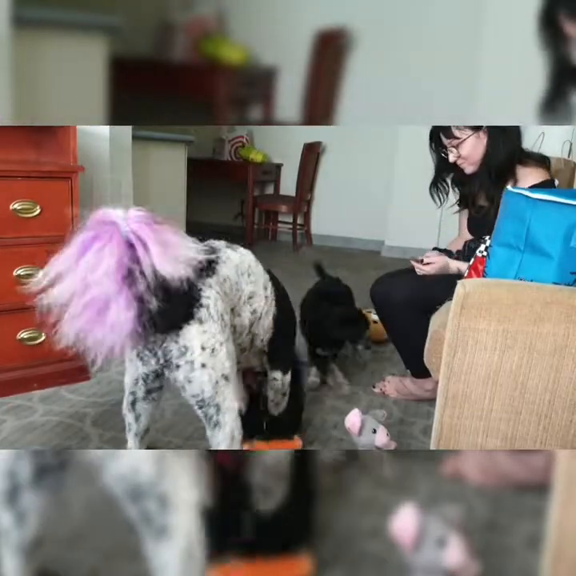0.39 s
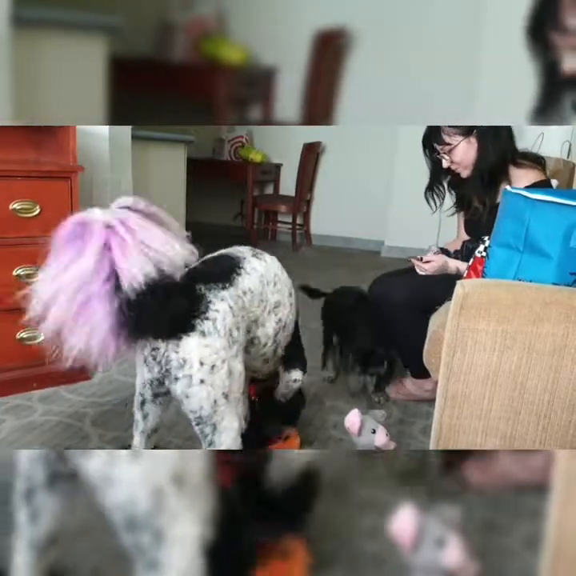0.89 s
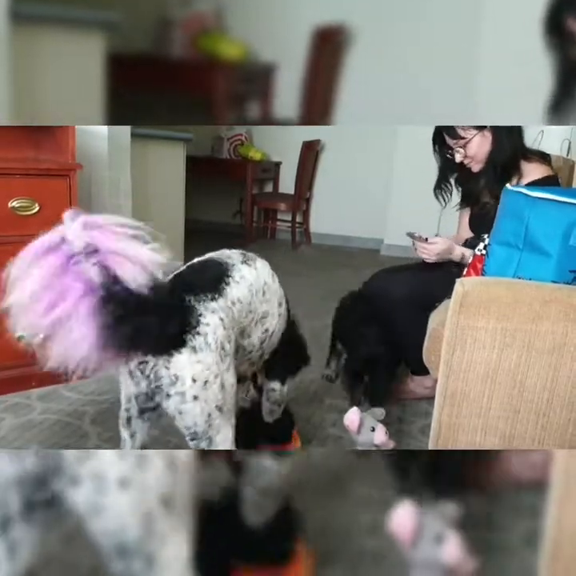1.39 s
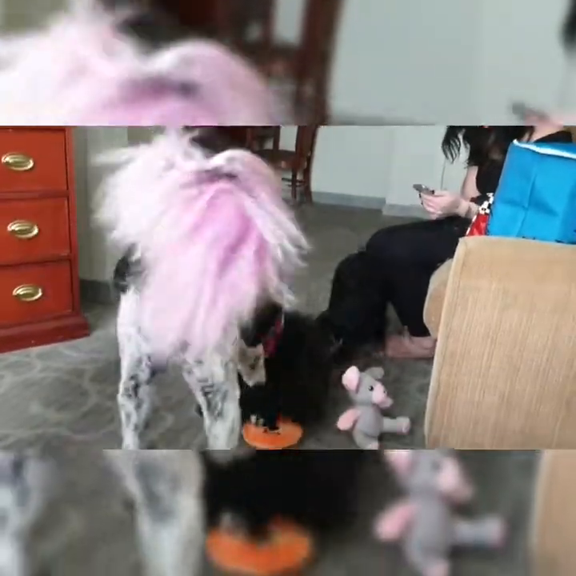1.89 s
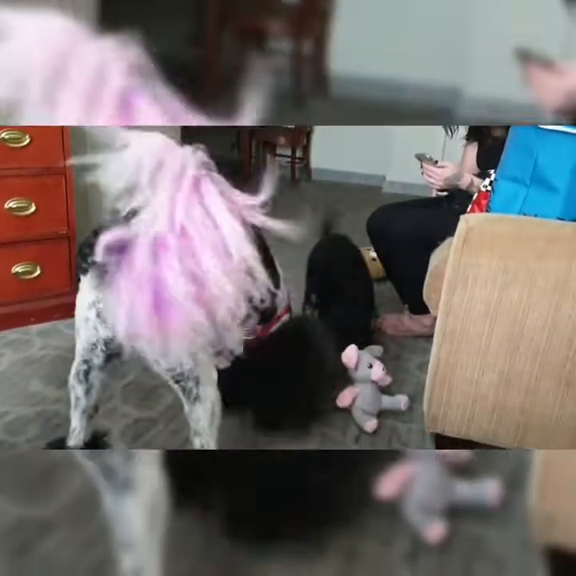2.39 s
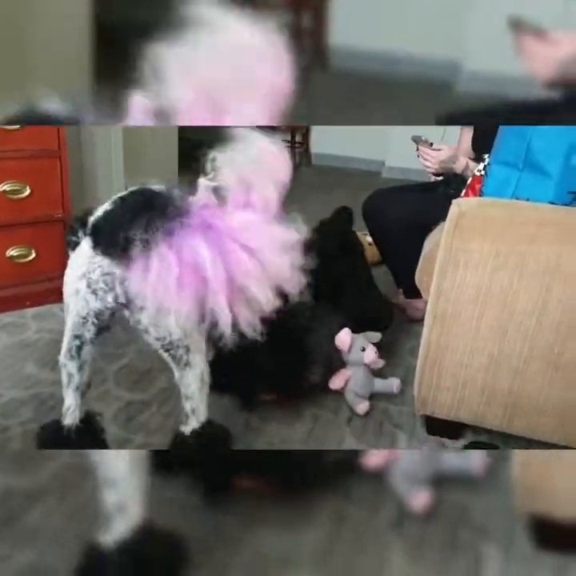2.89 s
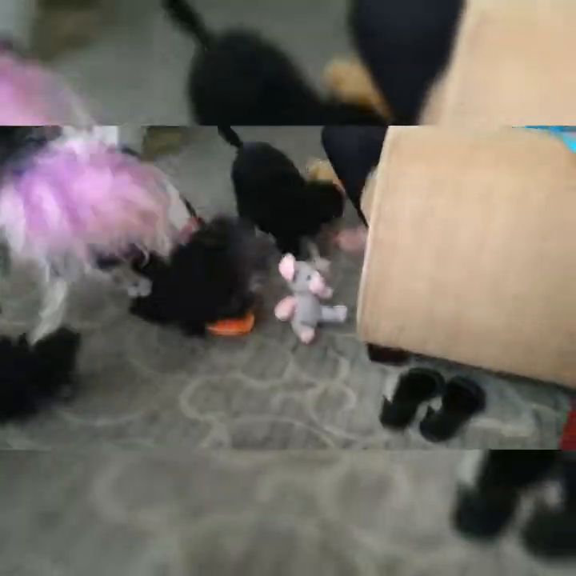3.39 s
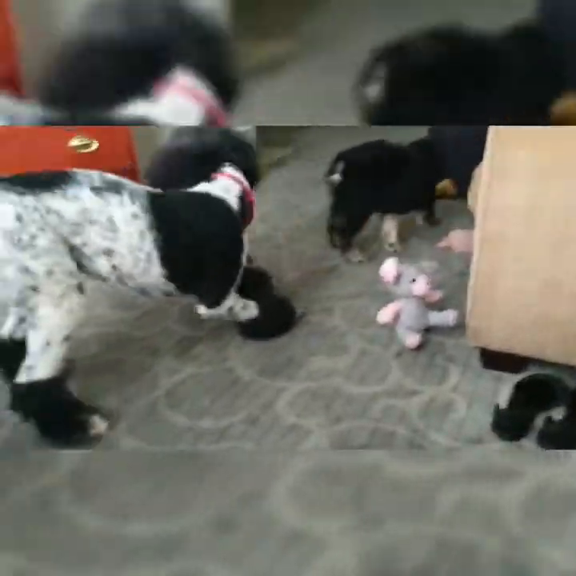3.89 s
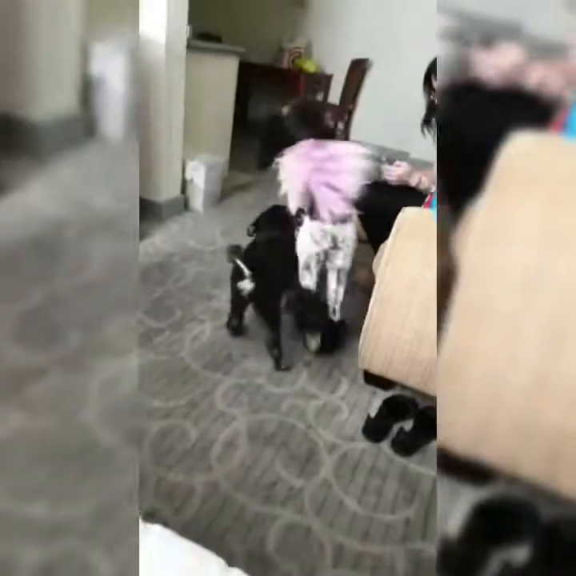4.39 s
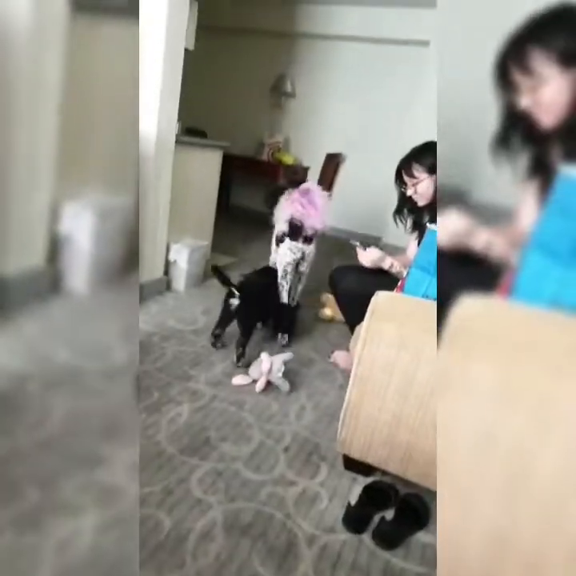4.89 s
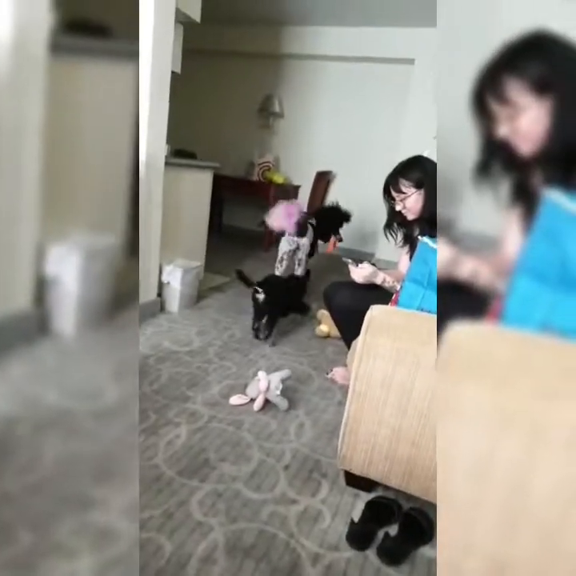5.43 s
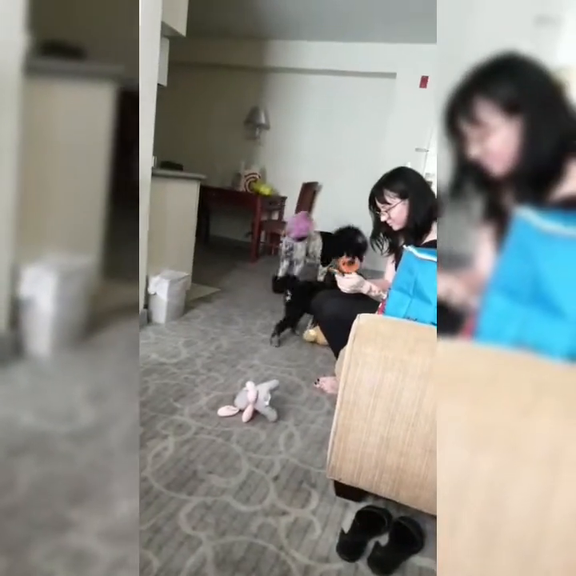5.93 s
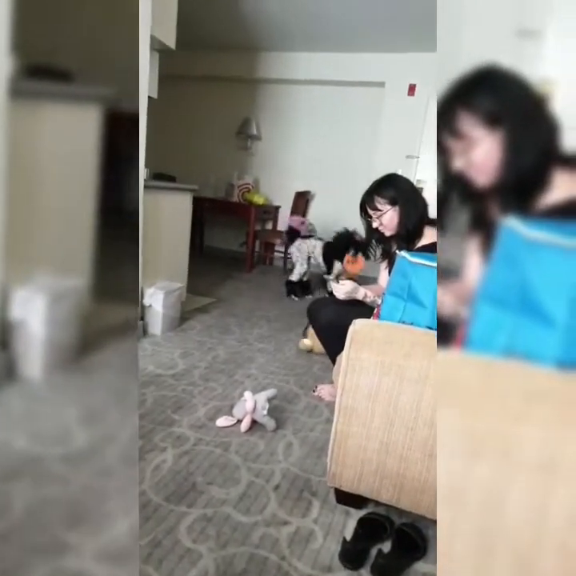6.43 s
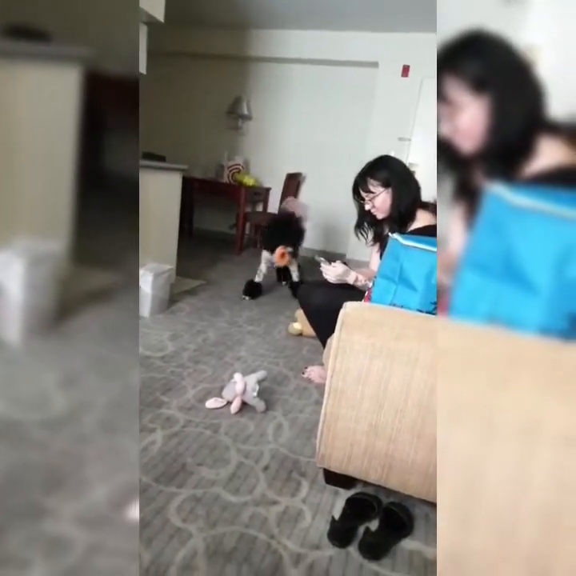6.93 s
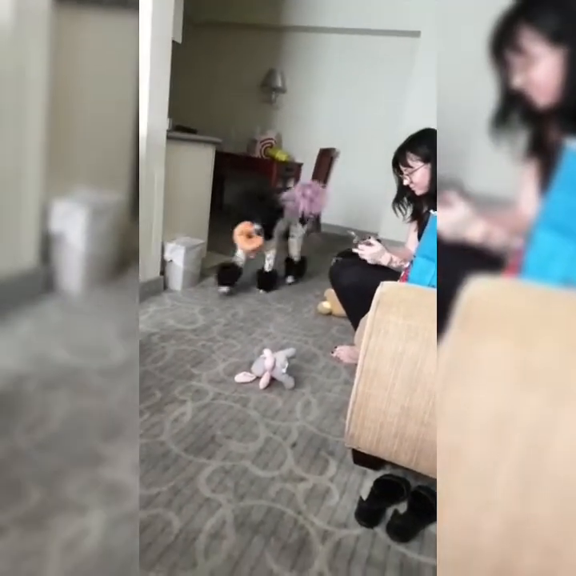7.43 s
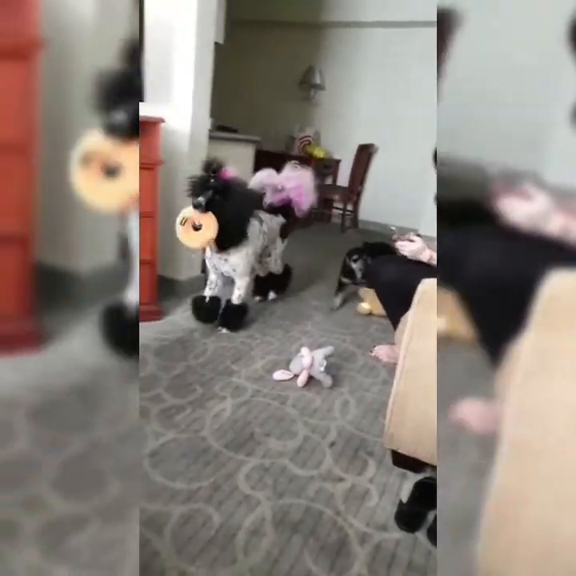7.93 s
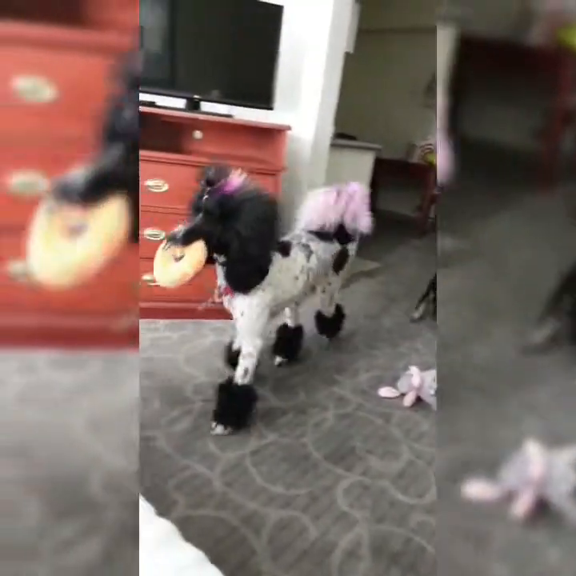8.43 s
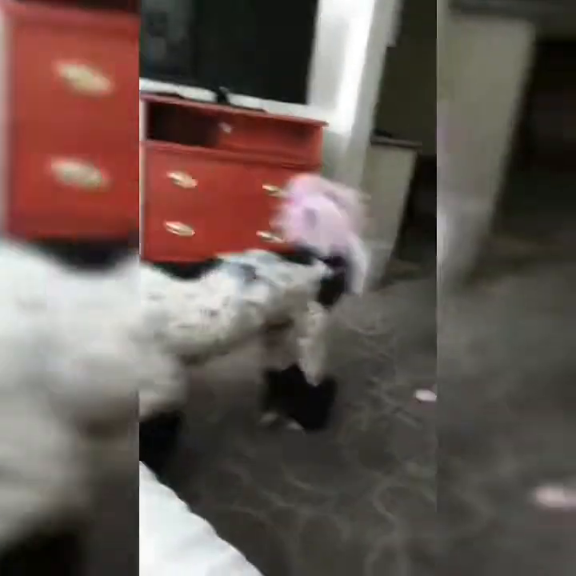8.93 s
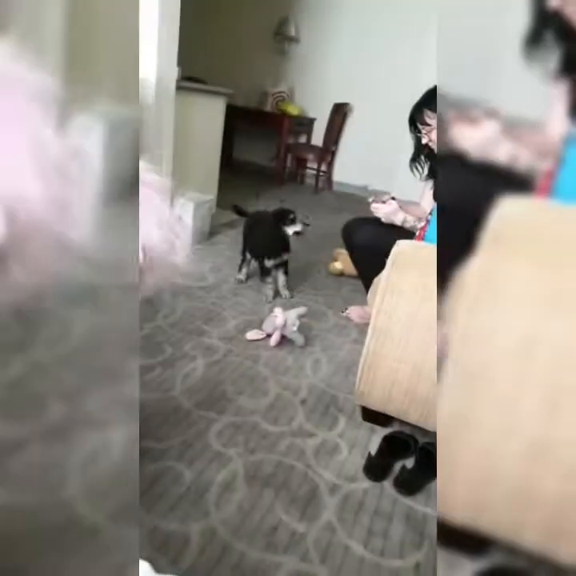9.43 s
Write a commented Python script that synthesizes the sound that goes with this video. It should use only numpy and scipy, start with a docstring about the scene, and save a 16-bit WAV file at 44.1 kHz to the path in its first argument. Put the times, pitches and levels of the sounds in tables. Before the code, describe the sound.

Dogs scuffle in a carpeted room, metal tags clinking, a toy squeaking shortly, while early handling thuds and creaks give way to cleaner sound.

```python
"""Two dogs playing on carpet

Collar tags ring as decaying modes, a toy's reed pulses through a hollow shell, fur and paws rustle as grainy noise.
First, in stereo, the phone is held sideways with a finger over its left port: duller there, with decaying low knocks,
lumpy rubbing noise and creaks of kicked case resonances. After a near-silence the phone is upright and the sound mono.
Filtered noise is the ventilation in both parts; a noise tail is the furnished room."""
import sys
import numpy as np
from scipy import signal
from scipy.fft import rfft, irfft, next_fast_len
from scipy.io import wavfile
from scipy.ndimage import uniform_filter1d

SR = 44100
rng = np.random.default_rng(int(sys.argv[2]) if len(sys.argv) > 2 else 0)


def linear_from_db(decibels):
    """Turn decibels (scalar or array-like) into linear amplitude factors; 0 gives 1."""
    return 10 ** (np.asarray(decibels, float) / 20)


def generate_wav(sig):
    """Save sig (samples, or channels by samples) to the path in sys.argv[1] as 16-bit PCM at SR."""
    pcm = np.round(np.clip(np.atleast_2d(sig).T, -1, 1) * 32767).astype(np.int16)
    wavfile.write(sys.argv[1], SR, pcm)


N = 422037
T = np.arange(N) / SR


def colour(x, points):
    """Filter by (f/Hz, gain/dB) points, interpolated over log frequency."""
    hz, db = np.transpose(points)
    n = next_fast_len(x.shape[-1])
    f = np.maximum(np.arange(n // 2 + 1) * SR / n, 1)
    gain = linear_from_db(np.interp(np.log(f), np.log(hz), db))
    return irfft(rfft(x, n) * gain, n)[..., :x.shape[-1]]


def band(x, hz, width_hz):
    """Resonance with gain 1 at the centre."""
    return signal.lfilter(*signal.iirpeak(hz, hz / width_hz, fs=SR), x)


def unit(x):
    """Scale to rms 1."""
    return x / np.sqrt(np.mean(x ** 2))


def walk(rate_hz, length=N):
    """Random levels held 1 / rate_hz and slewed."""
    k = int(SR / rate_hz)
    steps = np.repeat(rng.standard_normal(length // k + 1), k)
    return uniform_filter1d(steps, k)[:length]


def add(out, s, x):
    """Mix x into out from time s."""
    i = int(s * SR)
    out[i:i + len(x)] += x[:len(out) - i]


def ring(hz, t60_s, length_s):
    """A decaying sine."""
    t = np.arange(int(length_s * SR)) / SR
    return np.sin(2 * np.pi * hz * t) * 1000. ** (-t / t60_s)


# modes of the tags, in groups high, low pair, mid: f/Hz, level/dB, t60/s
TAG_MODES = [
    [(7330, -26, .08), (7920, -20, .07), (8515, -2.5, .11), (8650, -12.5, .08), (8698, 0, .14),
     (10640, -20, .07), (14160, -19, .12), (14600, -19, .1), (14770, -13, .1), (15230, -16, .07)],
    [(3765, -8, .07), (3857, 0, .095)],
    [(2325, -6, .06), (2500, -9, .05), (5440, 2, .075), (9375, -4, .09)],
]


def tag_modes(group_dbs, chance):
    """All modes at their groups' levels, shares and pitches shifted by chance; the ring takes a moment to build."""
    out = 0
    rows = [(hz, db + group_db, t60_s) for group, group_db in zip(TAG_MODES, group_dbs) for hz, db, t60_s in group]
    for (hz, db, t60_s), c in zip(rows, chance):
        out = out + linear_from_db(db + 2 * c) * ring(hz * (1 + .001 * c), t60_s, .4)
    build_s = 0.0036
    return out * np.clip(np.arange(len(out)) / SR / build_s, 0, 1)


def clatter(t):
    """Links knocking: a short swell of gritty noise through a broad band and eight random narrow ones."""
    swing = (1 - np.exp(-t / 0.006)) * np.exp(-t / 0.026)
    grit = rng.standard_normal(len(t)) * linear_from_db(3 * walk(120, len(t)))
    # each link has its own short ring
    small = sum(band(grit, hz, 300) for hz in rng.uniform(4000, 12500, size=8))
    return swing * (0.8 * band(grit, 9400, 6500) + 0.8 * small)


# blows on the collar tags: t/s, high modes/dB, low pair/dB, mid modes/dB, clatter/dB
BLOWS = [(0.02, -35.5, -39, -56, -40.5), (0.2398, -24.5, -30.5, -59, -36), (0.3743, -30.5, -30, -38, -34.5),
         (0.4477, -31, -43, -48, -60), (0.5623, -37, -70, -64, -35), (0.614, -29, -47, -51, -34),
         (0.9132, -36.5, -42, -48, -39), (0.9455, -31.5, -35.5, -52, -39), (1.6543, -38, -55, -62, -45),
         (1.906, -56.5, -72, -76, -58), (2.089, -46, -49, -68, -54), (2.317, -53, -54, -64, -58),
         (2.366, -44, -50, -46.5, -46), (2.3888, -20.5, -28, -36.5, -31.5), (2.6581, -44, -36.5, -59, -37),
         (2.6992, -47, -44, -63, -42.5), (2.748, -41, -48, -60, -51), (2.8944, -41, -46.5, -64, -52),
         (2.961, -41.5, -46, -67, -44), (3.03, -37.5, -64, -58, -39), (3.4681, -31.5, -41, -62, -36),
         (3.682, -27.5, -27.5, -40, -42), (4.2673, -42, -32.5, -62, -40), (4.5236, -37, -45, -54, -42.5),
         (4.574, -40, -41.5, -61, -50), (4.6216, -40, -28, -54, -37.5), (4.8755, -49.5, -42, -65, -48.5),
         (5.1883, -45, -41.5, -56, -40.5), (5.2386, -43, -37, -37.5, -35), (5.7487, -40.5, -57, -63, -44),
         (5.7932, -41.5, -45, -67, -44.5), (6.203, -44, -41.5, -50.5, -57), (6.272, -46.5, -46, -53, -65),
         (6.506, -48, -50, -45, -39.5), (6.529, -52, -37, -48.5, -57), (6.7192, -37.5, -44.5, -55, -39),
         (6.753, -37.5, -33, -45, -40), (6.9717, -29.5, -28.5, -46, -31.5),
         (7.0456, -30, -32.5, -50.5, -41), (7.242, -47.5, -36, -57, -43.5), (7.504, -47, -44.5, -64, -51),
         (7.535, -40, -39, -68, -52), (7.7492, -33, -40, -55, -29), (7.7573, -18.5, -31.5, -49, -54),
         (8.0628, -38, -31, -58, -50), (8.0761, -18, -27, -52, -33), (8.1637, -27, -17, -35, -35),
         (8.176, -20, -24, -35.5, -52), (8.2264, -27, -19, -58, -37), (8.3049, -57, -47, -59, -50),
         (8.467, -44.5, -50, -64, -55), (8.5674, -54, -52, -58, -42.5), (8.6445, -43, -41, -53, -38.5),
         (8.8326, -28.5, -27.5, -40, -35.5), (9.045, -57, -42.5, -63, -47.5), (9.189, -35.5, -34, -50, -44),
         (9.328, -46, -39.5, -44, -39), (9.4672, -66, -45, -47, -46)]
# faint touches between blows: level/dB of high, low pair, mid
IDLE_LEVELS = (-68, -66, -77.5)


def tags():
    """A blow is a short rattle of touches over a clatter of links; between blows the tags brush faintly."""
    count = sum(map(len, TAG_MODES))
    idle = linear_from_db(6.0 * walk(6)) * rng.standard_normal(N) * (rng.random(N) < 60 / SR)
    out = signal.fftconvolve(idle, tag_modes(IDLE_LEVELS, np.zeros(count)))[:N]
    luck = rng.standard_normal((len(BLOWS), count))
    t = np.arange(int(.2 * SR)) / SR
    gaps_s = np.diff(np.transpose(BLOWS)[0], append=N / SR)
    for (s, high_db, low_db, mid_db, clatter_db), chance, gap_s in zip(BLOWS, luck, gaps_s):
        sparse = rng.standard_normal(len(t)) * (rng.random(len(t)) < 120 / SR)
        touches = 0.35 * np.exp(-t / 0.05) * sparse
        touches[0] = 1
        touches = touches / np.sqrt(np.sum(touches ** 2))
        blow = signal.fftconvolve(touches, tag_modes((high_db, low_db, mid_db), chance))
        blow_t = np.arange(len(blow)) / SR
        # the next blow presses the tags together and stills most of this ring
        stilled = np.interp(blow_t, [gap_s, gap_s + .004], [1, .18])
        # the tags swing about
        turning = linear_from_db(3.5 * walk(55, len(blow)) * np.clip(blow_t / .02, 0, 1))
        add(out, s, blow * stilled * turning)
        add(out, s - .004, linear_from_db(clatter_db) * clatter(t))
        tick = np.diff(rng.standard_normal(len(t)), prepend=0) * np.exp(-t / 0.00078)
        add(out, s, linear_from_db(clatter_db - 1) * tick)
    return out


# squeezes: t/s, hold/s, top f/Hz, level/dB, shell gain above 4 kHz/dB
SQUEEZES = [(0.105, 0.019, 623, -24.5, 5), (.152, 0.031, 502.5, -35, -3.5), (1.297, 0.012, 608.6, -40, 11),
            (8.697, 0.0053, 638.6, -30.5, 5.5), (9.271, 0.025, 783, -25, -1)]
# pitch jitter of each squeeze, rms share of f
JITTER = (.055, .03, .003, .005, .022)
# shell response: f/Hz, gain/dB
SHELL = [(300, -10), (650, 6), (1400, 2), (2400, -3), (3100, -8), (3800, -11), (4700, -3), (5500, 0),
         (6800, -3), (8000, -14), (11000, -20), (14000, -38)]


def toy():
    """The reed snaps shut once a cycle; pulses and a puff of hiss ring the hollow shell."""
    squeeze_s, release_s = .022, .04
    onset_db, half_open_db, release_db = -11.5, -2, -14.5
    full_squeeze_db, rise, sag = -25, .12, .12  # rise, sag: pitch shares at full squeeze
    out = np.zeros(N)
    for (s, hold_s, top_hz, db, bright_db), jitter in zip(SQUEEZES, JITTER):
        held_s = squeeze_s + hold_s
        end_s = held_s + release_s
        force = linear_from_db(db - full_squeeze_db)
        t = np.arange(0, end_s, 1 / SR)
        pitch_t = [0, squeeze_s, (squeeze_s + held_s) / 2, held_s + release_s / 2]
        hz = top_hz * np.interp(t, pitch_t, [1 - rise * force ** 2, 1, 1, 1 - sag * np.sqrt(force)])
        shape_db = np.interp(t, [0, squeeze_s / 2, squeeze_s, held_s, end_s],
                             [onset_db, half_open_db, 0, 0, release_db])
        # a reed that flutters leaks more air
        hiss_db = 17 + 12 * np.log10(jitter)
        wobble = unit(uniform_filter1d(rng.standard_normal(len(t)), size=60))
        phase = 2 * np.pi * np.cumsum(hz * (1 + jitter * wobble)) / SR
        reed = unit(sum(np.cos(k * phase) for k in range(1, 21)))
        hiss = band(rng.standard_normal(len(t)), 4900, 4900) * (1 + np.cos(phase))
        response = [(f, g + bright_db * (f > 4000)) for f, g in SHELL]
        add(out, s, linear_from_db(db + shape_db) * colour(reed + linear_from_db(hiss_db) * hiss, response))
    return out


# fur and paws rubbing the carpet: t/s, dull band level/dB
SHUFFLE = [(0.0, -49.5), (0.36, -61), (1.97, -72), (2.48, -70), (3.86, -59), (4.16, -73.5), (4.5, -67),
           (4.71, -60), (5.13, -68.5), (6.15, -59.5), (6.76, -56.5), (7.46, -60.5), (8.14, -57),
           (9.22, -61), (9.57, -55)]


def rustle():
    """Grainy rubbing of fur and pile, a duller and a brighter band."""
    shuffle_db = np.interp(T, *np.transpose(SHUFFLE))
    # the bright band grows faster than the dull one
    swish_db = -57.5 + 1.58 * (shuffle_db + 58.5)
    out = 0
    for db, hz, width_hz in [(shuffle_db, 1800, 2770), (swish_db, 7000, 4900)]:
        grains = rng.standard_normal(N) * linear_from_db(3.66 * walk(25) + 1.9 * walk(400))
        out = out + linear_from_db(db) * unit(band(band(grains, hz, width_hz), hz, width_hz))
    return out


# soft hollow scuffs: t/s, length/s, centre f/Hz, level/dB
SCUFF_EVENTS = [(0.663, 0.14, 1840, -58.5), (5.468, 0.073, 1150, -62.5), (6.069, 0.18, 1440, -56),
                (6.385, 0.064, 1360, -52.5), (7.536, 0.043, 1290, -55), (7.816, 0.07, 1360, -52),
                (8.13, 0.083, 1350, -54.5), (9.09, 0.034, 1400, -52.5)]


def scuffs():
    """Short swells of noise in a narrow hollow band."""
    width_hz = 240
    out = np.zeros(N)
    for s, length_s, hz, db in SCUFF_EVENTS:
        noise = rng.standard_normal(int(length_s * SR))
        noise = band(band(noise, hz, width_hz), hz, width_hz)
        add(out, s, linear_from_db(db) * unit(noise) * np.sqrt(np.hanning(len(noise))))
    return out


def room(x):
    """Direct sound and a noise tail, unrelated at the two ports; its treble fades slightly slower."""
    low_t60_s, high_t60_s, tail_db = .25, 1.15 * .25, -6
    t = np.arange(int(.6 * SR)) / SR
    noise = rng.standard_normal((2, len(t))) * (t > .004)
    low = signal.lfilter([.3], [1, -.7], noise)
    tail = low * 1000. ** (-t / low_t60_s) + (noise - low) * 1000. ** (-t / high_t60_s)
    tail = linear_from_db(tail_db) * tail / np.sqrt(np.sum(tail[0] ** 2))
    return x + signal.fftconvolve(x[None], tail, axes=1)[:, :N]


# finger knocks on the covered port: t/s, thud level/dB, pocket f/Hz, snap level/dB
PORT_KNOCKS = [(0.843, -10.5, 119, -21), (1.433, -1, 163, -0.8), (1.446, -10.5, 70.5, -20),
               (1.474, -10.5, 98, -28), (1.526, -15, 144, -13.5), (1.549, -7.5, 220, -37),
               (1.555, -11, 106, -12), (1.569, -21, 51.1, -25), (1.597, -20, 59.5, -26),
               (2.387, -22.5, 80, -48), (2.802, -13, 80.7, -24.5), (2.845, -11.5, 98, -30),
               (2.891, -10.5, 73, -40), (3.07, -15, 104, -34), (3.099, -12, 92, -45),
               (3.196, -19.5, 104, -21), (3.247, -20.5, 107, -44), (3.316, -15, 94.5, -12),
               (3.416, -15.5, 79.5, -58), (3.522, -6.5, 111, -15.5), (3.544, -12, 74.4, -34),
               (3.721, -3.5, 94, -10), (3.818, -10.5, 107, -26), (3.856, -21, 102, -25),
               (3.897, -25, 51.1, -24.5), (3.904, -3, 59, -17), (4.026, -16, 137, -14.5),
               (4.063, -12, 248, -24), (4.076, -5.5, 106.5, -7.5), (4.139, -24.5, 110, -34),
               (4.271, -26, 91, -30)]


def knocks():
    """The air pocket under the finger is sucked, then squeezed: a soft low ring and a snap."""
    thuds, snaps = np.zeros(N), np.zeros(N)
    for s, db, hz, snap_db in PORT_KNOCKS:
        thud = linear_from_db(db) * ring(hz, 4.5 / hz, .2)
        add(thuds, s, -.25 * thud[:int(.25 * SR / hz)])
        add(thuds, s + 0.0025, thud)
        # a hard snap is brighter
        snap_hz = 374 * linear_from_db(1.5 * np.clip(snap_db - db, 0, 6))
        add(snaps, s + 0.00291, linear_from_db(snap_db) * ring(snap_hz, 0.0077, .02))
    soft = colour(thuds, [(400, 6), (1500, -7.5), (4000, -44)])
    return soft + colour(snaps, [(1500, 5.0), (3000, -18.5), (6000, -34.0)])


# finger sliding on the port: t/s, length/s, rumble level/dB, scrape level/dB
SLIDES = [(0.69, 0.46, -38.5, -73), (1.41, 0.27, -30.5, -49.5), (2.31, 0.22, -37.5, -68),
          (2.78, 0.42, -26.5, -50.5), (3.118, 0.28, -33, -46), (3.466, 0.66, -27.5, -52.5),
          (3.86, 0.1, -25, -38.5), (3.999, 0.09, -23, -40.5), (4.1, 0.33, -40.5, -59.5)]


def rub():
    """Skin sliding on the port pumps lumpy low noise into it, over a fainter scrape."""
    rest_db, edge_s = (-43, -70), 0.076  # rumble and scrape of the resting finger
    gains = linear_from_db(np.array(rest_db))[:, None] * np.ones(N)
    for s, length_s, *dbs in SLIDES:
        moving = np.clip(np.minimum(T - s, s + length_s - T) / edge_s + .5, 0, 1)
        gains = np.maximum(gains, linear_from_db(np.array(dbs))[:, None] * moving)
    lumps = linear_from_db(4.5 * walk(30))
    low = colour(rng.standard_normal(N), [(30, -15), (80, 0), (200, -8), (500, -35), (2000, -70)])
    rumble = unit(lumps * low)
    grain = linear_from_db(3.0 * walk(150))
    mid = colour(rng.standard_normal(N), [(120, -23), (250, -11.5), (400, 5.5), (1000, -7), (4000, -29.0)])
    return gains[0] * rumble + gains[1] * unit(grain * mid)


# finger sticking and slipping: t/s, length/s, slip rate/Hz, level/dB
STICK_SLIPS = [(1.842, 0.24, 48, -41.5), (3.256, 0.075, 65, -23.5), (3.576, 0.063, 69, -22.5),
               (3.631, 0.094, 54, -23), (3.727, .13, 69.5, -22.5)]
# case resonances: f/Hz, width/Hz, relative level/dB
CASE_MODES = [(66, 30, 0), (560, 260, -12)]


def creaks():
    """Each slip is a kick that rings the case; slips swell, fade and slow down at the end."""
    edge_s, edge_db, slowing_share, uneven_share = 0.0383, -9, 0.212, .1
    kicks = np.zeros(N)
    for s, length_s, rate_hz, db in STICK_SLIPS:
        t = np.arange(0, length_s, 1 / SR)
        edge = np.clip(1 - np.minimum(t, length_s - t) / edge_s, 0, 1)
        slowing = slowing_share * edge * (t > length_s / 2)
        slip_hz = rate_hz * (1 - slowing + uneven_share * walk(59.5, len(t)))
        slips = np.floor(np.cumsum(slip_hz) / SR)
        add(kicks, s, -linear_from_db(db + edge_db * edge) * np.diff(slips, prepend=0))
    rings = sum(SR / width_hz * linear_from_db(db - 8) * band(kicks, hz, width_hz) for hz, width_hz, db in CASE_MODES)
    return colour(rings, [(700, 0), (1100, -25), (3000, -60)])


# effect of the finger on the left port: f/Hz, gain/dB
COVER_GAIN = [(60, 1), (400, -12.5), (700, -13.5), (1300, -19.5), (2400, -24), (4400, -27.5), (8100, -38.5),
              (15000, -28)]


def covered(x):
    """The finger over the port dulls what passes."""
    return colour(x, COVER_GAIN)


# ventilation spectrum, phone sideways: f/Hz, relative density/dB
SIDEWAYS_SPECTRUM = [(18, -55), (30, -6.5), (81, 1.5), (649, -17.5), (937, -23.5), (3980, -40.5),
                     (5900, -41.5), (8740, -38.5), (16000, -48.5)]
# same, phone upright: f/Hz, relative density/dB
UPRIGHT_SPECTRUM = [(25, -7.5), (45, -12.5), (57, 8.5), (75, -6), (140, -10), (400, -19.5), (1000, -30),
                    (3000, -47), (7000, -57), (14000, -59)]


def air(points, db, count):
    """Steady ventilation noise that swells slightly, in count unrelated channels."""
    return linear_from_db(db + 0.82 * walk(2.863)) * unit(colour(rng.standard_normal((count, N)), points))


def scene():
    """Stereo with the left port covered, a near-silence, then mono."""
    stop_s, stop_fade_s, restart_s, restart_fade_s = 4.322, 0.0028, 4.49, 0.049
    finger_leak_db, creak_leak_db, mono_top_hz = -26, -15.0, 13850
    dogs = room(tags() + toy() + rustle() + scuffs())
    sideways = linear_from_db(3.0) * dogs + air(SIDEWAYS_SPECTRUM, -42.5, count=2)
    sideways[0] = covered(sideways[0])
    finger = knocks() + rub()
    creak = creaks()
    # slips shake the whole case, so the far port hears more of them
    sideways += np.array([finger + creak, linear_from_db(finger_leak_db) * finger + linear_from_db(creak_leak_db) * creak])
    upright = dogs[1] + air(UPRIGHT_SPECTRUM, -40.5, count=1)[0]
    lowpass = signal.ellip(12, .5, 80, mono_top_hz, fs=SR, output="sos")
    upright = signal.sosfilt(lowpass, upright)
    first = np.clip((stop_s - T) / stop_fade_s, .005, 1) * (T < restart_s)
    second = np.clip((T - restart_s) / restart_fade_s, 0, 1)
    return sideways * first + upright * second


def top_cut(x):
    """Nothing passes above the cut-off."""
    return signal.sosfilt(signal.butter(12, 15900, fs=SR, output="sos"), x)


def record(dry):
    """The microphone drops the deepest bass, the converter tops out softly."""
    thin = signal.sosfilt(signal.butter(2, 40, "high", fs=SR, output="sos"), dry)
    return top_cut(np.tanh(thin))


dry = scene()
out = record(dry)
generate_wav(out)
```